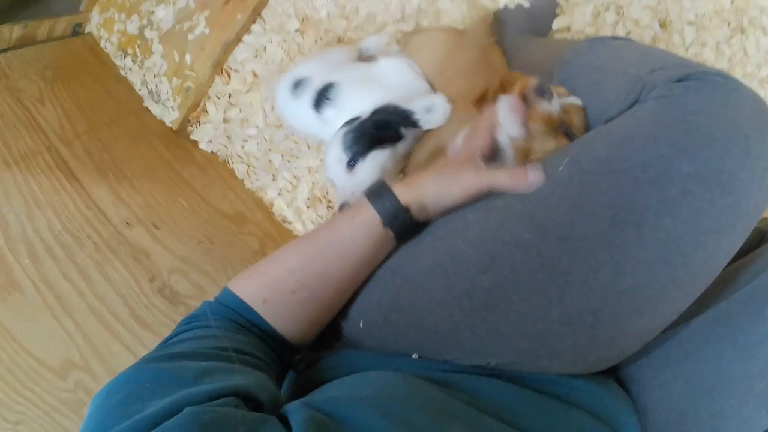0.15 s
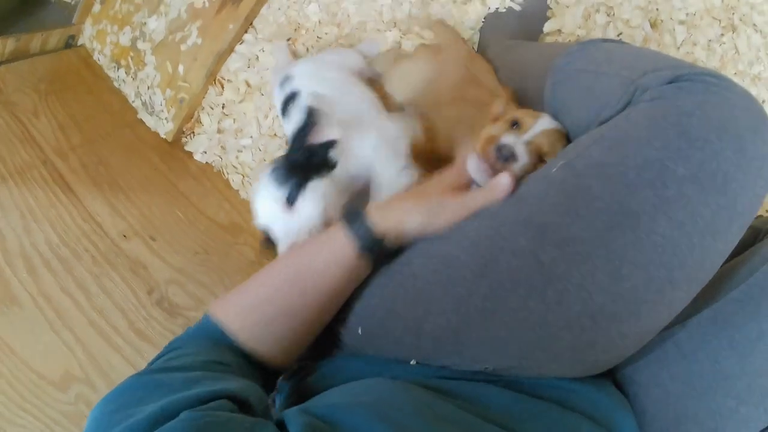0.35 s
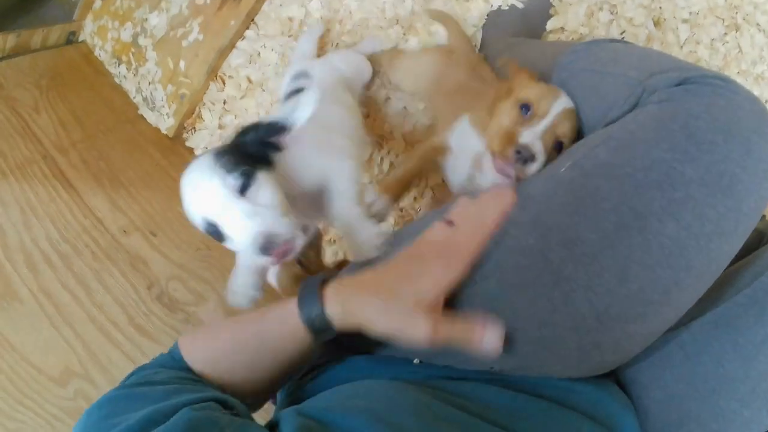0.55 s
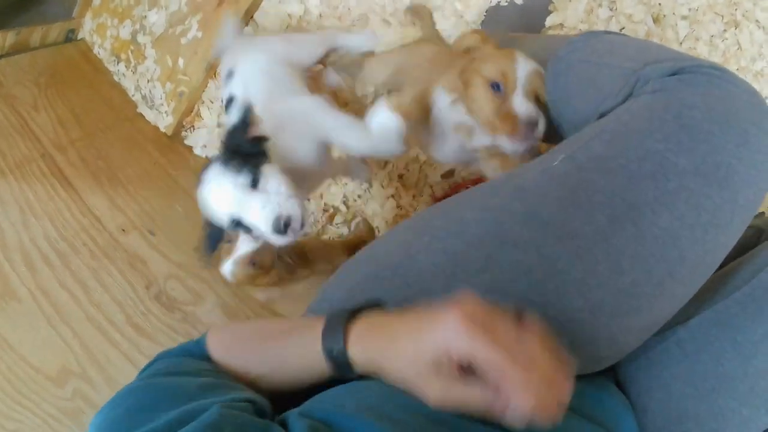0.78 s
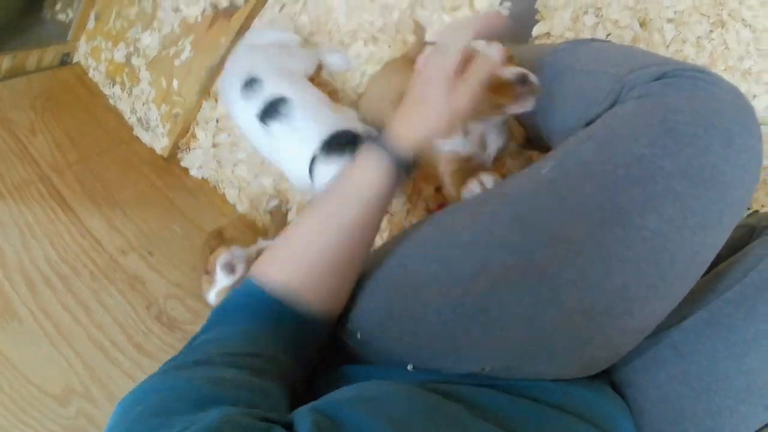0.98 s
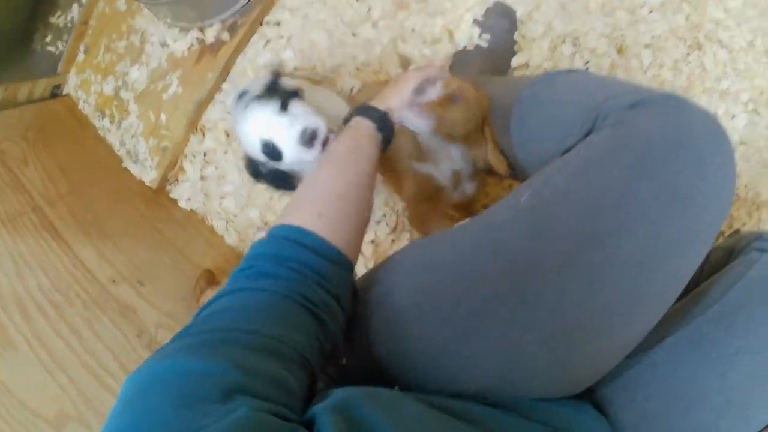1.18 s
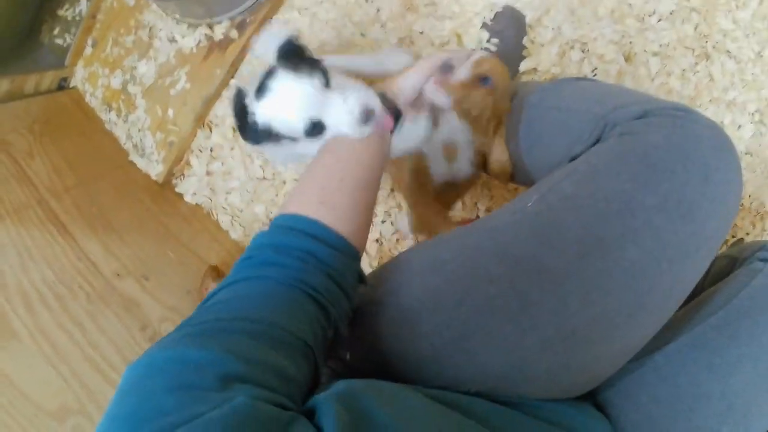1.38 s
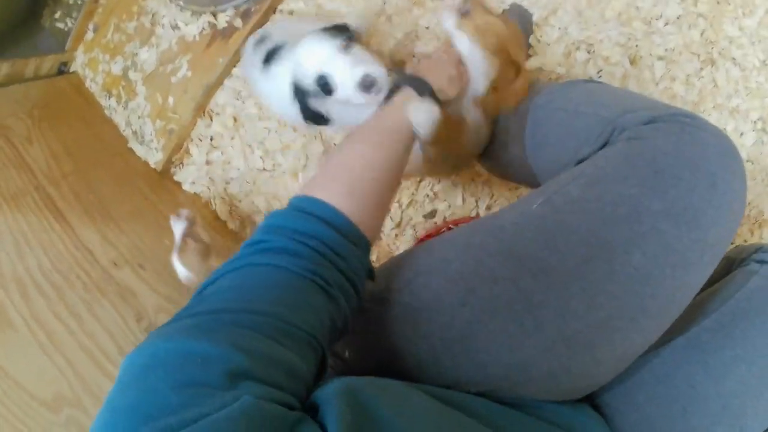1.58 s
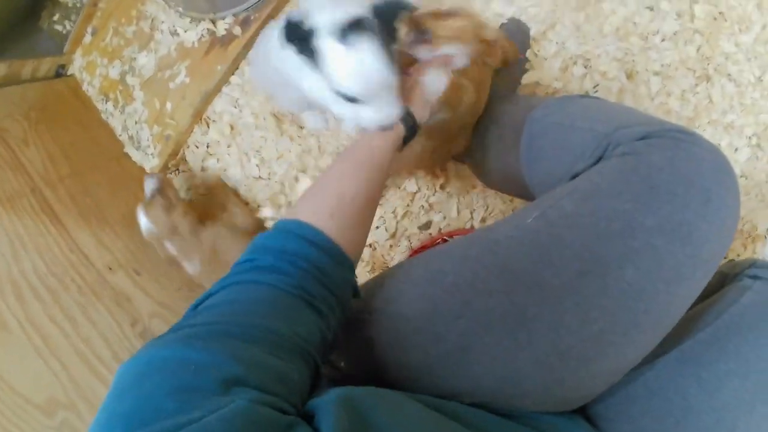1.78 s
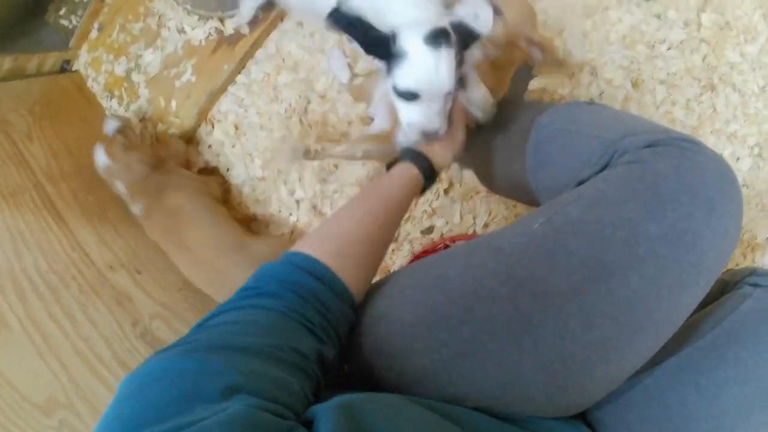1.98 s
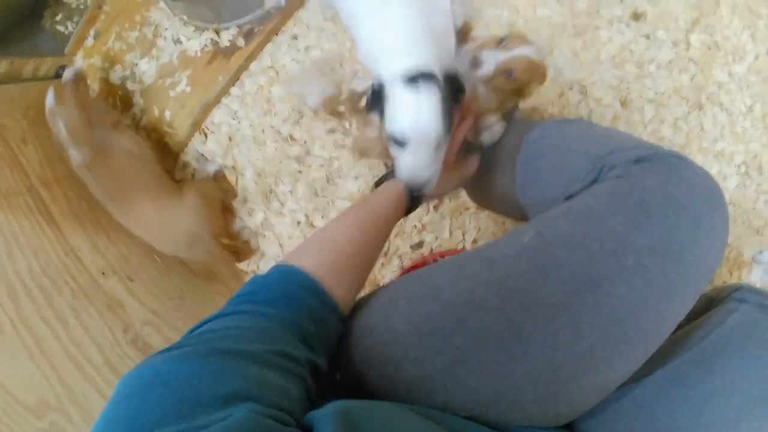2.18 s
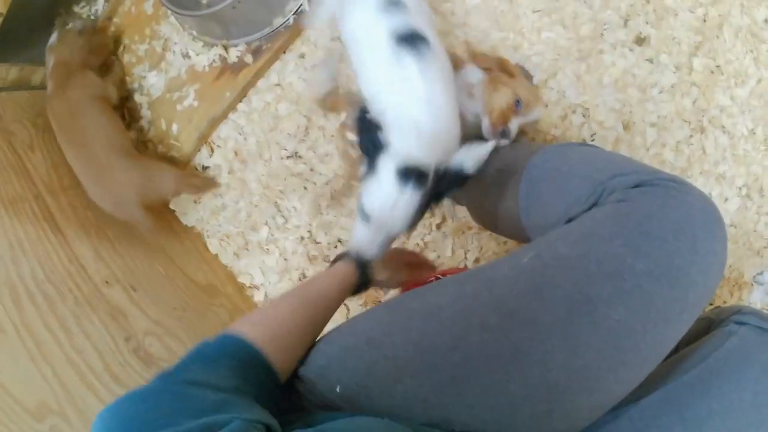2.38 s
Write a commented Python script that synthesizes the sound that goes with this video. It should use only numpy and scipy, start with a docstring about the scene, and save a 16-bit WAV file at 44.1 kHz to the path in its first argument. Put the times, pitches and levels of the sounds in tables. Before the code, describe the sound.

After a littermate's brief falling whimper, five high puppy yips follow in quick succession, with soft thuds, small grunts and light rustling; close microphone, short indoor reflections, steady faint room air and uneven low rumble.

```python
"""A littermate's falling whimper and a rustle of shavings open over a low rumble and steady room air.
A puppy then yips five times: harmonics glide up with an open mouth, then thin to a held whine.
Littermates whimper in gliding tones, grunt in uneven pulses and bump ringing boards; shavings rustle
as grainy noise. The walls of the wooden pen answer the animals briefly with decaying noise tails."""
import sys
import numpy as np
from scipy import signal
from scipy.fft import rfft, irfft, next_fast_len
from scipy.io import wavfile
from scipy.ndimage import uniform_filter1d, minimum_filter1d, map_coordinates

SR = 44100
rng = np.random.default_rng(int(sys.argv[2]) if len(sys.argv) > 2 else 0)


def pcm_store(signal):
    """Save signal as 16-bit PCM."""
    levels = np.round(np.clip(np.atleast_2d(signal), -1, 1) * 32767)
    wavfile.write(sys.argv[1], SR, levels.astype(np.int16).T)


N = 108045
T = np.arange(N) / SR
WAVER_DB = 6  # slow unsteadiness of each voiced partial


def amp(db):
    """dB to gain."""
    return 10 ** (np.asarray(db) / 20)


def unit(x):
    """Scaled to rms 1."""
    return x / np.sqrt(np.mean(x ** 2) + 1e-20)


def along(points, hz):
    """Interpolates (Hz, value) points on a log frequency axis."""
    point_hz, values = np.transpose(points)
    return np.interp(np.log(hz + 1), np.log(point_hz + 1), values)


def curves(rows):
    """One value per sample for each column after the time."""
    s, *columns = np.transpose(rows)
    return [np.interp(T, s, column) for column in columns]


def wobble(knots_per_s):
    """A smooth random curve through normal knots."""
    return map_coordinates(rng.standard_normal(400), [T * knots_per_s])


def filtered(x, response):
    """x times a response of frequency, zero-padded against wrap-around."""
    size = next_fast_len(N + SR // 2)
    spectrum = rfft(x, size) * response(np.fft.rfftfreq(size, 1 / SR))
    return irfft(spectrum, size)[..., :N]


def noise(spectrum, lumps_db=0):
    """Coloured noise of rms 1, closed outside its spectrum; lumps_db modulates it before the filter."""
    low_hz, high_hz = spectrum[0][0], spectrum[-1][0]
    lumpy = rng.standard_normal(N) * amp(lumps_db)
    response = lambda hz: amp(along(spectrum, hz)) * (hz > low_hz) * (hz < high_hz)
    return unit(filtered(lumpy, response))


def gate(start_s, end_s, edge_s):
    """Soft on at start, soft off at end."""
    inside_s = np.minimum(T - start_s, end_s - T)
    return np.sin(np.pi / 2 * np.clip(inside_s / edge_s, 0, 1)) ** 2


def rumble():
    """Low-frequency noise on a swelling level curve."""
    # Each row: time in seconds, level in dB.
    swells = [(0.0, -38), (0.28, -27.5), (0.38, -42), (0.46, -23.5), (0.59, -36.5), (0.97, -25),
              (0.99, -31.5), (1.05, -22), (1.85, -32), (1.88, -27), (2.4, -29), (2.45, -31)]
    # Each row: frequency in Hz, relative spectral density in dB.
    depths = [(15, -10.5), (27, 4.5), (45, -12), (64, -2), (82, -4.5), (105, -24.5)]
    return amp(curves(swells)[0]) * noise(depths)


def room_air():
    """Steady broadband noise, its level drifting slightly."""
    # Each row: frequency in Hz, relative spectral density in dB.
    air_spectrum = [(71, -27), (120, 2), (415, -9), (552, -8), (704, -9.5), (1100, -11), (1350, -12.5),
                    (5280, -27.5), (11400, -25.5), (15500, -35.5)]
    return amp(-43 + wobble(7.2)) * noise(air_spectrum)


def rustles():
    """Shavings: grainy noise under bell-shaped strokes."""
    # Each row: centre in seconds, length in seconds, peak level in dB.
    stroke_rows = [(0, 0.071, -48.5), (0.792, 0.023, -46), (.91, 0.062, -44), (1.053, .02, -49.5),
                   (1.181, 0.007, -37.5), (1.203, 0.013, -46.5), (2.055, 0.043, -40.5),
                   (2.21, 0.066, -50.5), (2.387, 0.064, -49)]
    # Each row: frequency in Hz, relative spectral density in dB.
    shavings = [(2000, 1.5), (8000, 2.5), (12000, 3), (15500, -17)]
    grain_db = 2.5
    strokes = sum(amp(db) * np.exp(-((T - s) / length_s * 2) ** 2) for s, length_s, db in stroke_rows)
    return strokes * noise(shavings, grain_db * wobble(110))


def whimpers():
    """Other pups: short glides with three wavering harmonics."""
    # Each row: start in seconds, length in seconds, first and last pitch in Hz, fundamental level in dB,
    # fall per harmonic in dB.
    whimper_rows = [(-.02, 0.056, 1244, 902, -21.5, 22), (-.02, 0.17, 841, 741, -50, 0),
                    (.62, 0.15, 575, 563, -48, -1), (0.961, 0.096, 1158, 1161, -36, 28),
                    (1.176, 0.032, 1308, 1285, -11.5, 43), (1.95, 0.22, 576, 567, -51, 12),
                    (2.194, 0.27, 616.6, 678, -51.5, 26)]
    out = 0
    for s, length_s, first_hz, last_hz, db, fall_db in whimper_rows:
        hz = np.interp(T, [s, s + length_s], [first_hz, last_hz])
        phase = 2 * np.pi * np.cumsum(hz * (1 + 0.0057 * wobble(30.8))) / SR
        tone = 0
        for k in range(3):
            level_db = db - fall_db * k + WAVER_DB * np.minimum(wobble(30.52), 1)
            tone = tone + amp(level_db) * np.sin((k + 1) * phase)
        out = out + tone * gate(s, s + length_s, 0.04)
    return out


def yips():
    """Throat-shaped harmonics, unsteadier in fast upward glides; rasp and hiss pulse once a cycle."""
    # One table a yip. Each row: time in seconds, pitch in Hz, then relative levels in dB of the fundamental,
    # 2nd harmonic, open mouth's overtones, higher harmonics.
    yip_tables = [
        [(0.163, 683, -34.5, -48, -100, -77), (0.189, 935, -34.5, -29, -40, -55),
         (0.213, 1019, -12.5, -29.5, -40.5, -44), (0.269, 1260, -22, -29.5, -40.5, -47.5),
         (0.281, 1201, -32, -71, -39, -56), (0.325, 1176, -27.5, -52, -63, -46),
         (0.387, 1172, -31.5, -45, -53, -46), (0.423, 1093, -13, -46, -36, -43.5),
         (0.465, 1091, -21.5, -53, -46, -41.5), (0.505, 1067, -28.5, -50, -46, -48)],
        [(0.647, 761, -40, -34, -38, -61), (0.659, 798.3, -29.5, -37.5, -38.5, -47),
         (0.669, 888, -23.5, -19.5, -18, -51), (0.697, 1153, -23, -20.5, -13.5, -32.5),
         (0.715, 1215, 1.5, -26.5, -36, -33.5), (0.739, 1221, -18.5, -61, -48, -52),
         (0.799, 1221, -22, -75, -51, -42.5), (0.843, 1200, -19, -54, -42.5, -48.5),
         (0.877, 1170, -9, -34.5, -27.5, -34.5), (0.928, 1168, -19, -48, -36.5, -68)],
        [(1.065, 836.2, -38, -28, -46, -53), (1.077, 873, -25, -27.5, -30, -42),
         (1.103, 1116, -13, -16, -12.5, -48), (1.121, 1304, -11.5, -24.5, -26.5, -37),
         (1.147, 1345, -13.5, -44, -40, -42), (1.165, 1222, -27.5, -53, -53, -49),
         (1.199, 1168, -33, -55, -47, -43), (1.233, 1038, -38, -41, -47, -56),
         (1.265, 1003, -30.5, -48.5, -52, -45), (1.298, 1003, -36.5, -59, -58, -65)],
        [(1.455, 789, -49, -38, -52, -36), (1.469, 799, -31.5, -20, -38, -48),
         (1.483, 886, -31, -17, -28.5, -45), (1.513, 1219, -28.5, -26.5, -18.5, -47),
         (1.527, 1260, -39, -59, -35, -52), (1.579, 1221, -35.5, -41.5, -46, -41),
         (1.633, 1227, -33, -59, -39, -38), (1.685, 1221, -33, -49, -42, -42),
         (1.717, 1172, -30, -47, -39.5, -39.5), (1.76, 1177, -33, -53, -55, -42.5)],
        [(1.927, 803.9, -42, -32, -43, -55), (1.939, 840, -30.5, -25.5, -36.5, -40),
         (1.959, 1103, -15.5, -31, -18, -31.5), (1.979, 1227, -13.5, -31, -17.5, -38),
         (1.997, 1332, -20.5, -69, -55, -38), (2.059, 1253, -30.5, -69, -64, -45),
         (2.083, 1226, -28, -45, -56, -40.5), (2.111, 1231, -33, -52, -44.5, -36),
         (2.157, 1224, -36, -43.5, -45, -37), (2.188, 1050, -31.5, -50, -67, -46)],
    ]
    # A row a yip: open mouth's hiss against its overtones in dB, shift of harmonics above the 6th in dB.
    edge_rows = [(-20, 2), (-30, 3), (-29, -2), (-29, 0), (-36, -6)]
    # Each row: frequency in Hz, throat gain in dB.
    throat = [(2300, -1), (2900, -4.5), (3500, 1), (4000, -3.5), (4600, -18.5), (6000, -15.5), (7400, -9),
              (8500, -17), (12000, -12), (14000, -31)]
    # Each row: frequency in Hz, relative spectral density in dB.
    breath = [(5000, -5), (8000, -23.5), (10000, -2), (12800, -1.5), (15500, -43)]
    release_s, release_drop, release_db = 0.027, 0.31, -17  # closing fall: time, share of pitch, level
    fast_glide_hz_per_s = 6000
    flutter_held_db, flutter_glide_db = 1.5, 3  # glide part is added to the held part
    split_hz, glide_opens_hz = 4500, 1500  # open mouth below, thin whine above; a glide lifts the split
    waver_grows_db = .4  # per harmonic number
    held_share = .35  # share of waver left in the open mouth's overtones
    rasp_db, breath_db = -25, -22  # against the open mouth's overtones, the higher harmonics
    treble_fade_db = 1  # per harmonic above the 6th

    tables = []
    for rows in yip_tables:
        s, last_hz, *levels_db = rows[-1]
        fall = [s + release_s, last_hz * (1 - release_drop), *np.add(levels_db, release_db)]
        tables.append([*rows, fall])
    hz, first_db, second_db, mouth_db, high_db = curves(np.concatenate(tables))
    edge_points = [(row[0], *edge) for rows, edge in zip(tables, edge_rows) for row in (rows[0], rows[-1])]
    hiss_db, top_db = curves(edge_points)

    rise = np.clip(np.gradient(hz) * SR / fast_glide_hz_per_s, 0, 1)
    glide = uniform_filter1d(rise, size=300)

    def flutter_db():
        """Quick level changes, a new draw each call."""
        return (flutter_held_db + flutter_glide_db * glide) * np.minimum(wobble(90), 1)

    phase = 2 * np.pi * np.cumsum(hz * (1 + 0.00531 * wobble(120))) / SR  # jittered pitch
    voice = amp(first_db + glide * flutter_db() / 2) * np.sin(phase)
    voice = voice + amp(second_db + flutter_db()) * np.sin(2 * phase)
    for k in range(3, 17):
        high = np.clip(.5 + (k * hz - split_hz - glide_opens_hz * glide) / 900, 0, 1)
        level_db = mouth_db + high * (high_db - mouth_db) + along(throat, k * hz)
        level_db = level_db - treble_fade_db * max(k - 6, 0) + (k > 6) * top_db
        waver_share = held_share + (1 - held_share) * high
        waver_db = waver_share * (WAVER_DB + waver_grows_db * k) * np.minimum(wobble(21.42), .5)
        unsteady_db = waver_db + (0.78 + high) * flutter_db()
        voice = voice + amp(level_db + unsteady_db) * np.sin(k * phase)

    pulse = 1 + np.cos(phase)
    rasp = amp(mouth_db + rasp_db) * noise([(1500, -15), *throat[:6]]) * pulse
    hiss = (amp(high_db + breath_db) + amp(mouth_db + hiss_db)) * noise(breath) * pulse
    gates = sum(gate(rows[0][0], rows[-1][0], 0.0042) for rows in tables)
    return (np.sqrt(2) * voice + rasp + hiss) * gates


def grunts():
    """Uneven low pulses mixed with noise gated once a cycle, shaped by the chest."""
    # Each row: start in seconds, length in seconds, level in dB.
    grunt_rows = [(0.346, 0.043, -39), (2.376, 0.0266, -32.5)]
    # Each row: frequency in Hz, chest gain in dB; closed below the first.
    chest = [(400, -29), (600, 0), (1600, 2), (2600, -14), (4200, -14), (6000, -55)]
    pulse_hz, noise_share = 545, .7
    cycles = np.cumsum(pulse_hz * (1 + 0.035 * wobble(140))) / SR
    pulses = unit(np.diff(np.floor(cycles), prepend=0))
    gated_noise = unit(rng.standard_normal(N) * (cycles % 1 < .5))
    source = pulses + noise_share * gated_noise
    hoarse = unit(filtered(source, lambda hz: amp(along(chest, hz)) * (hz > chest[0][0])))
    return hoarse * sum(amp(db) * gate(s, s + length_s, 0.002) for s, length_s, db in grunt_rows)


def bumps():
    """Soft paws ring the boards' decaying modes, a little differently each time, with a dull puff."""
    # Each row: start in seconds, relative level in dB, shift of puff and upper modes in dB.
    bump_rows = [(0.584, -17.5, -21), (0.632, -34, -24), (0.791, -28.5, -4.5), (0.906, -26.5, -9),
                 (1.016, -27.5, -16), (1.712, -25.5, 0.5), (1.883, -28, -3), (2.084, -36.5, 2.5)]
    # Each row: nominal mode frequency in Hz, relative level in dB, t60 in seconds.
    boards = [(163, 1.5, 0.17), (268, 0.5, 0.16), (414, -7, 0.049), (745, -9, 0.12)]
    puff_db, puff_t60_s = 6, 0.15
    out, puff = 0, noise([(150, 3), (800, -18)])
    for s, db, upper_db in bump_rows:
        t = np.maximum(T - s, 0)
        ring = amp(puff_db + upper_db - 60 * t / puff_t60_s) * puff
        for k, (hz, mode_db, t60_s) in enumerate(boards):
            level_db = mode_db + (k > 1) * upper_db + 2 * rng.normal() - 60 * t / t60_s
            ring = ring + amp(level_db) * np.sin(2 * np.pi * hz * rng.normal(1, 0.031) * t)
        out = out + amp(db - 8) * ring * (1 - np.exp(-t / 0.002))  # 2 ms soft contact
    return out


def pen_walls(x):
    """Delayed noise tails, each frequency dying at its own speed; tails crossfade every quarter second."""
    # Each row: frequency in Hz, t60 in seconds.
    decay = [(500, 0.28), (1500, 0.25), (3500, 0.14), (10000, 0.15)]
    # Each row: frequency in Hz, relative gain of the walls' answer in dB.
    wall_colour = [(1300, -4), (1700, -4), (3000, 1), (12000, -5)]
    delay_s, walls_db = .011, -4.5
    out = np.zeros(N)
    for start in np.arange(0, N, SR // 4):
        hz, t, z = signal.stft(rng.standard_normal(SR // 2), SR, nperseg=256)
        dying = z * amp(-60 * t / along(decay, hz)[:, None])
        tail = signal.istft(dying, SR, nperseg=256)[1]
        part = x * np.clip(1 - abs(np.arange(N) - start) / (SR // 4), 0, 1)
        delayed = np.pad(part, (round(delay_s * SR), 0))
        out += signal.fftconvolve(delayed, tail / np.linalg.norm(tail))[:N]
    return filtered(out, lambda hz: amp(walls_db + along(wall_colour, hz)))


def scene():
    """Pups and bumps with the walls' answer, over rustles, rumble and air."""
    near = whimpers() + yips() + grunts() + bumps()
    background = rumble() + room_air() + rustles()
    return (near + pen_walls(near) + background)[None]


def record(dry):
    """A smoothed look-ahead limiter lowers peaks towards its ceiling, then a band limit cuts the top."""
    ceiling, top_hz = .95, 15700
    needed = minimum_filter1d(np.minimum(1, ceiling / (abs(dry) + 1e-9)), size=441)
    limited = dry * uniform_filter1d(needed, size=221)
    return filtered(limited, lambda hz: hz < top_hz)


dry = scene()
out = record(dry)
pcm_store(out)
```